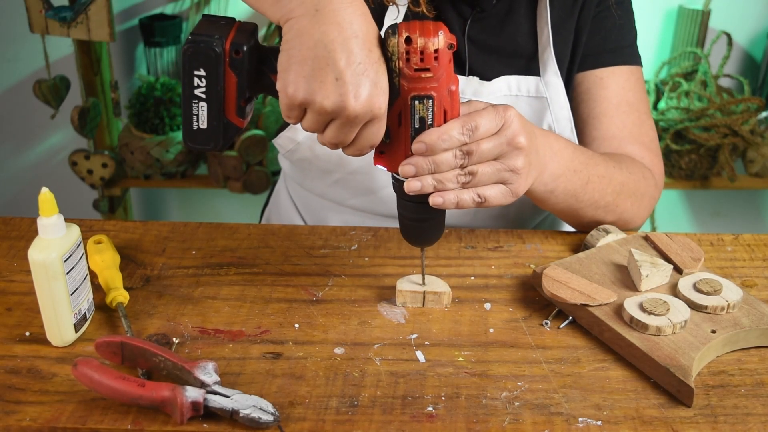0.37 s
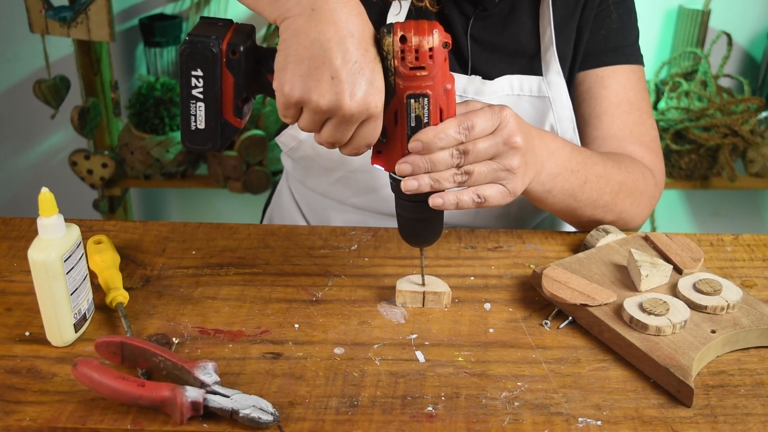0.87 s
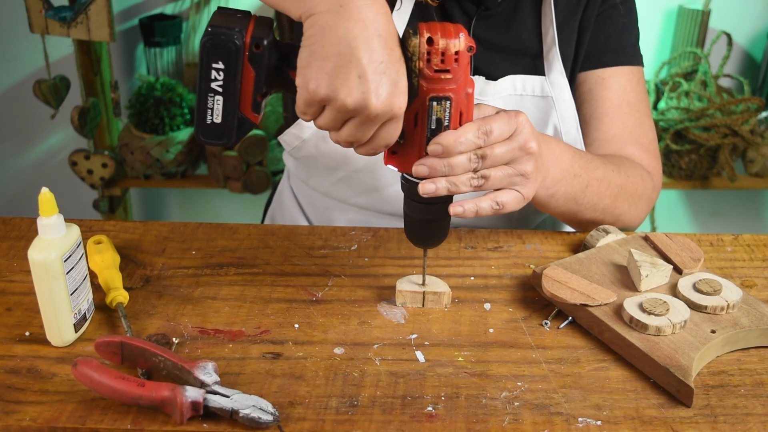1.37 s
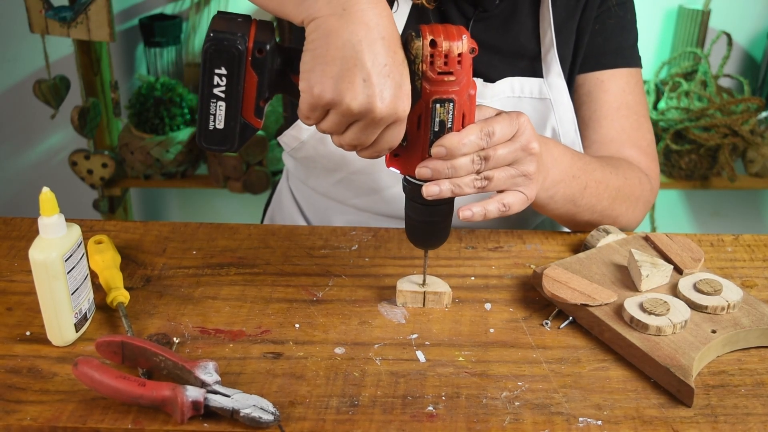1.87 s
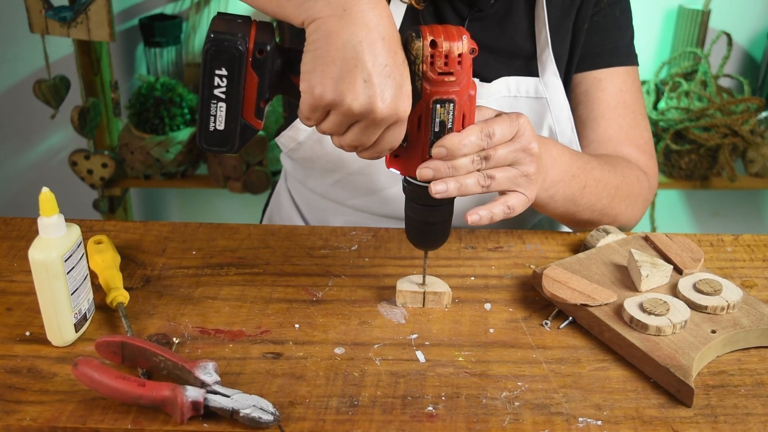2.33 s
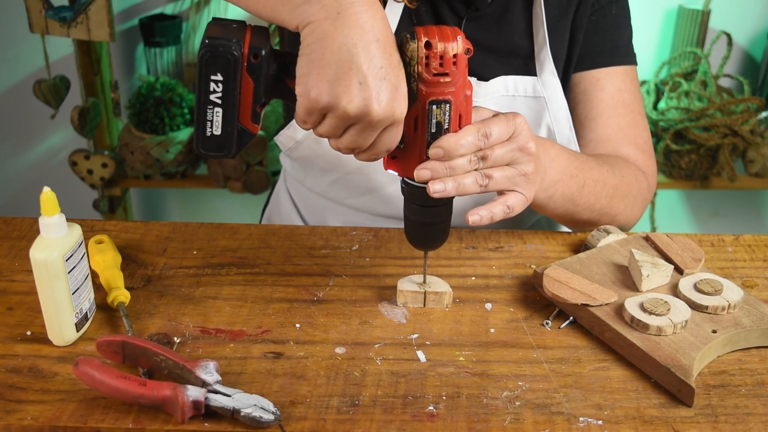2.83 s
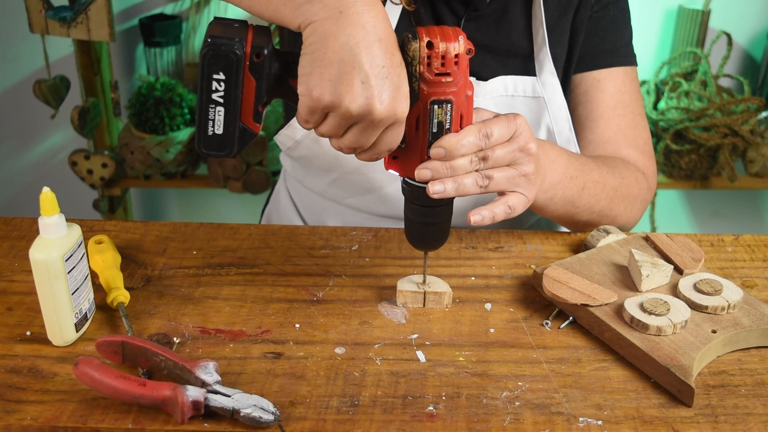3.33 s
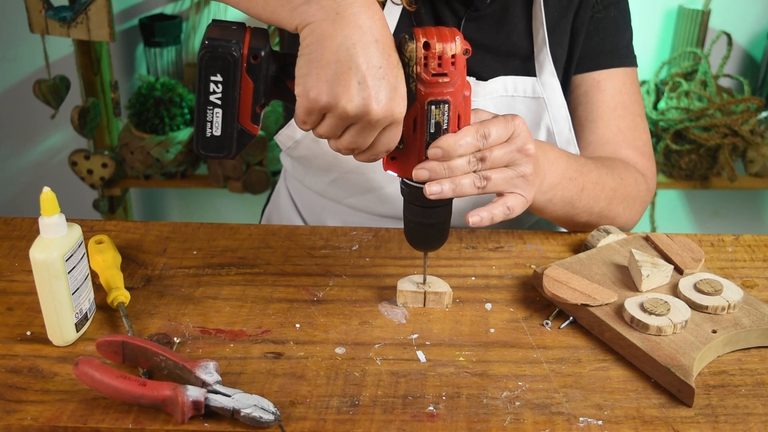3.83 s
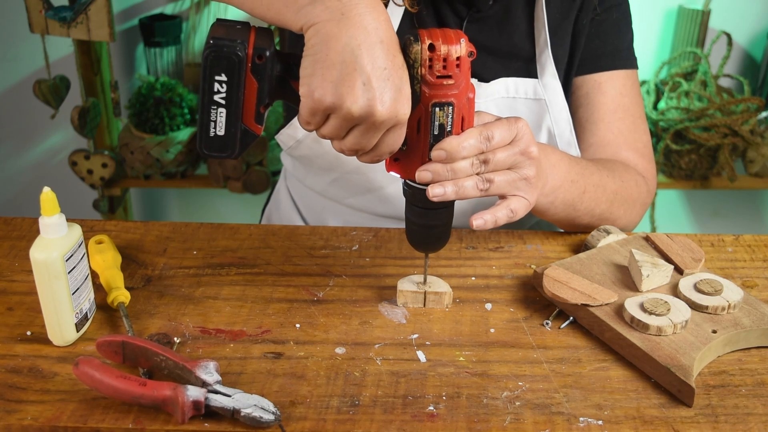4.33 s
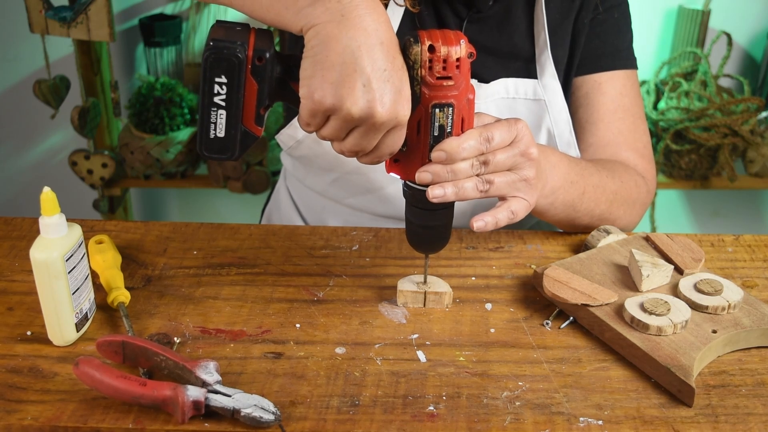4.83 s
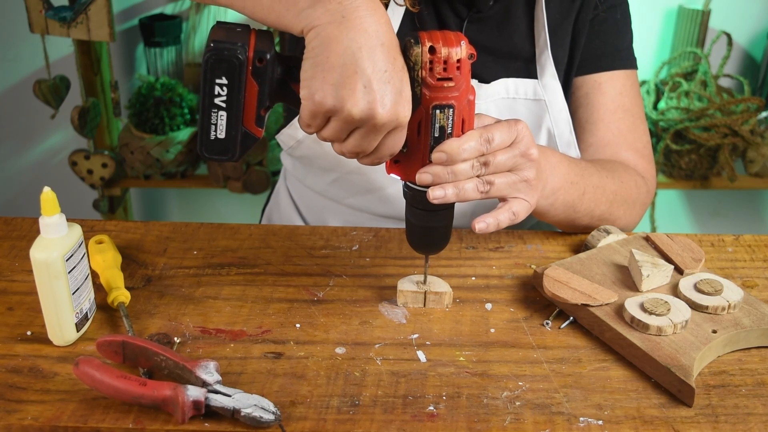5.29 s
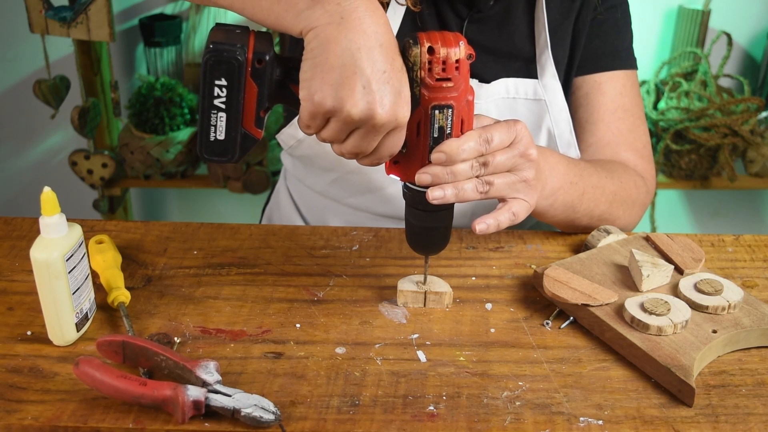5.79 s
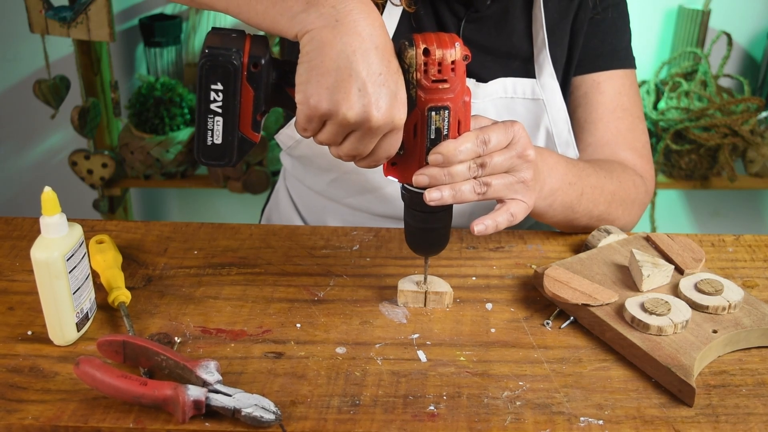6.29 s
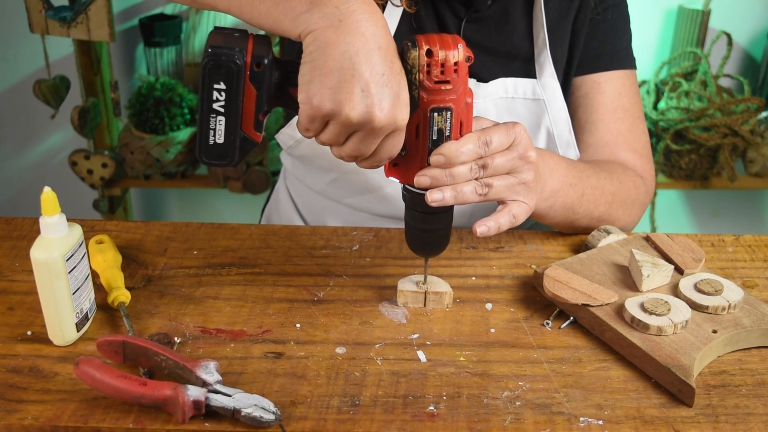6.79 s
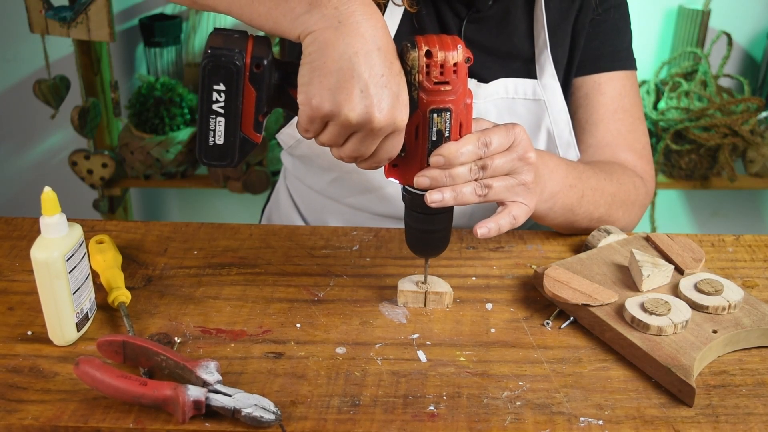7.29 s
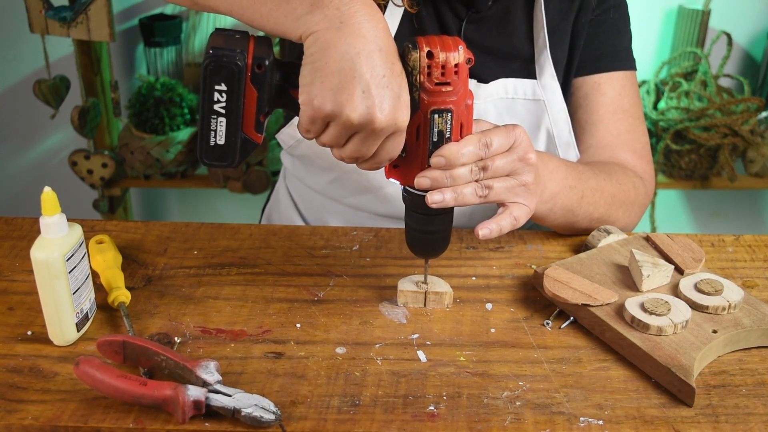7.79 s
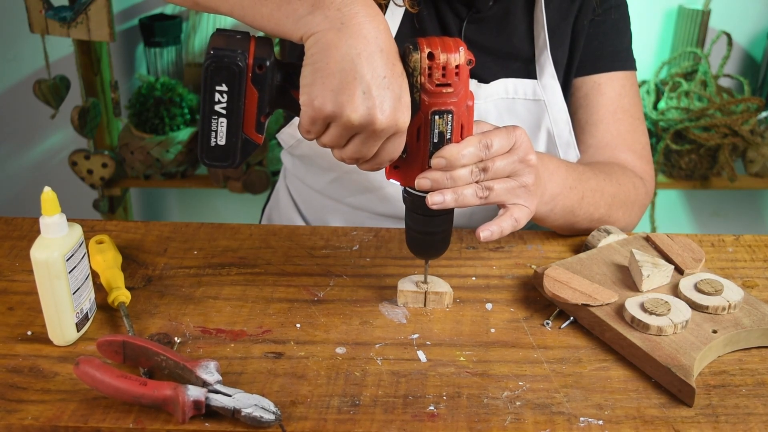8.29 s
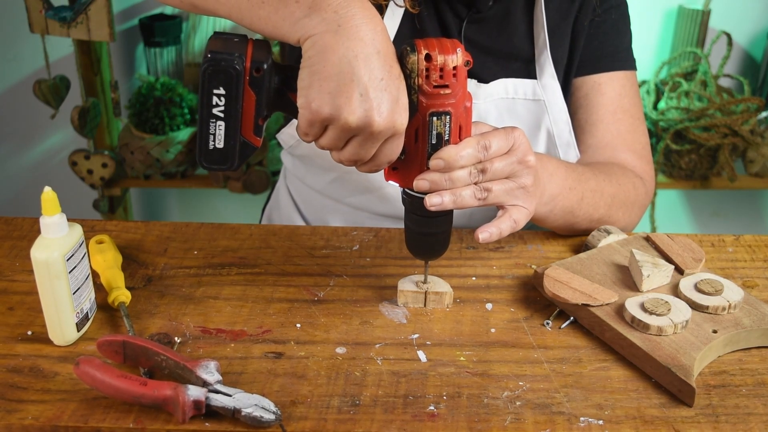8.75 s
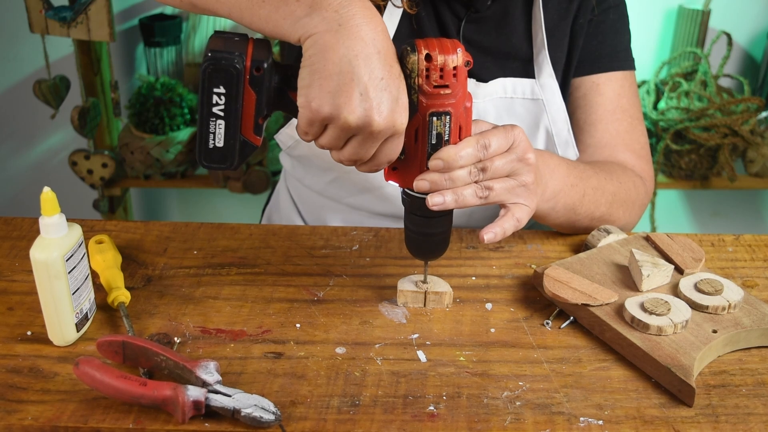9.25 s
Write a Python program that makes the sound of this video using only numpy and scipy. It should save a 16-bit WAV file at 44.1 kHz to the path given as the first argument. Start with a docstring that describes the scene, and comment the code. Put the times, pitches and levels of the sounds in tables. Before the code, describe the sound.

A small cordless drill is already running at full speed and never stops. A piercing motor and gear whine sits over bright hiss and gritty rattle, throbbing rapidly with the turning chuck. After about a second and a half the bit bites the wood; the throb roughens and the pitch sags very slightly. Faint rasp and low bench hum lie below. Close, dry, mono microphone.

```python
"""On a workbench, a cordless drill bores into a scrap of wood, close to a mono microphone.
The three-pole brushed motor whines in sine tones over brush hiss, noise that pulses with the motor's turns.
A two-stage planetary gearbox sings on its tooth rate with noisy skirts, throbbing once, twice and three times
a chuck turn, and changes its song as the bit bites and goes deeper. Noise gives rattle, ticks, rasp and rumble."""
import sys
import numpy as np
from scipy import signal
from scipy.fft import rfft, irfft, next_fast_len
from scipy.io import wavfile
from scipy.ndimage import map_coordinates

SR = 44100
rng = np.random.default_rng(int(sys.argv[2]) if len(sys.argv) > 2 else 0)


def invert_db(x):
    """Field ratio 10**(x/20) for x, a level in decibels (scalar or array-like)."""
    u = np.asarray(x, float) / 20
    return 10 ** u


def bounce(signal):
    """Save signal as a 16-bit WAV file at the path given by the first command-line argument."""
    frames = np.transpose(np.atleast_2d(signal))
    limited = np.clip(frames, -1, 1)
    pcm = np.round(limited * 32767).astype(np.int16)
    wavfile.write(sys.argv[1], SR, pcm)


N = 413658  # length in samples

RING_TEETH = 39
STAGE = 9 / (9 + RING_TEETH)  # turns out per turn in: each stage has a 9-tooth sun in the ring


def unit(x):
    """Scales x to rms 1."""
    return x / np.sqrt(np.mean(np.abs(x) ** 2) + 1e-20)


def curves(rows):
    """One value per sample for each column after the time in seconds."""
    seconds, *columns = np.transpose(rows)
    return [np.interp(np.arange(N) / SR, seconds, column) for column in columns]


def wobble(rate):
    """A random curve: straight lines between normal-distributed knots, rate knots a second."""
    knots = rng.standard_normal(int(N * rate / SR) + 4)
    return map_coordinates(knots, [np.arange(N) * rate / SR], order=1)


def noise(response):
    """Noise of rms 1 with the given gain over frequency."""
    m = next_fast_len(N)
    spectrum = rfft(rng.standard_normal(m)) * response(np.fft.rfftfreq(m, 1 / SR))
    return unit(irfft(spectrum, m)[:N])


def coloured(points):
    """Noise with a (Hz, dB) spectrum, falling 19 dB an octave more below its first point."""
    f, db = np.transpose(points)

    def gain(hz):
        outline_db = np.interp(np.log(hz + 1), np.log(f + 1), db)
        return invert_db(outline_db - 19 * np.log2(np.maximum(f[0] / (hz + 1), 1)))

    return noise(gain)


def humming(hz, width_hz):
    """Noise in one resonance, width_hz wide at half amplitude."""
    return noise(lambda f: 1 / (1 + (2 * (f - hz) / width_hz) ** 2))


def scatter(width_hz):
    """Quick random changes, weak below 9 Hz: they average out within a chuck turn or two."""
    return noise(lambda f: np.clip(f / 9, 0, 1) ** 2 / (1 + (2 * f / width_hz) ** 2))


def round_turn(pairs, turns):
    """Sum of swings once, twice, .. a turn, each a (size, place of its top in turns) pair."""
    grid = np.linspace(0, 1, 1025)
    shape = np.zeros(len(grid))
    for k, (size, place) in enumerate(np.reshape(pairs, (-1, 2))):
        shape += size * np.cos(2 * np.pi * (k + 1) * (grid - place))
    return shape[(turns % 1 * (len(grid) - 1)).astype(int)]


def depth_shares():
    """Amplitude share of each depth of the bit; the powers add to one."""
    # Each row: time in seconds, depth of the bit (0 touching, 1 biting, 2 deep).
    depth_rows = [(0, 0), (1.4, 0), (2.05, 1), (5.4, 1), (6.4, 2), (9.4, 2)]
    depth, = curves(depth_rows)
    return [np.sqrt(np.clip(1 - abs(depth - k), 0, 1)) for k in range(3)]


def by_depth(db):
    """A (touching, biting, deep) level read at the load on the bit."""
    # How hard the bit works. Each row: time in seconds, load (0 touching, 1 biting, 2 deep).
    load_rows = [(0, 0), (1.25, .05), (2.1, .85), (3.5, 1.05), (5, 1.4), (6.6, 1.66), (8, 1.9)]
    return np.interp(curves(load_rows)[0], np.arange(len(db)), db)


def throbbing(spectra, throbs, chuck, shares):
    """Noise whose colour and throb round the chuck turn follow the depth."""
    out = np.zeros(N)
    for points, throb, share in zip(spectra, throbs, shares):
        out += share * invert_db(round_turn(throb, chuck)) * coloured(points)
    return out


def bench_shake():
    """The work shakes the bench: a slowly changing rumble in a resonance round 100 Hz."""
    # Each row: time in seconds, level in dB.
    rumble_rows = [(1, -80), (3, -70), (4, -80), (6, -79), (8, -71), (9.4, -75)]
    return invert_db(curves(rumble_rows)[0] + 1.5 * wobble(3)) * humming(100, 45)


def bench_noise(chuck, shares, flutter):
    """The bench rumbles under the drill: broad low noise that throbs with the chuck."""
    # Colour of the bench. Each row: frequency in Hz, relative density in dB per Hz.
    spectrum = [(15, -71), (25, -28), (151, -13), (216, -16), (285, -11), (394, -6), (444, -12), (519, 0),
                (718, -10), (961, -17), (1200, -10), (1350, -6), (1500, -7), (1950, -31), (3300, -120)]
    # Each row, a depth: size in dB and place of its top in turns, for swings 1, 2, 3 times a chuck turn.
    throbs = [(.9, 0.51, .2, .45, .4, 0.14), (1.3, .05, 0.63, 0.33, .2, .3), (1.4, .08, .5, .45, .3, .02)]
    # Level in dB when touching, biting, deep.
    levels_db = (-49.5, -53.5, -52)
    level_db = by_depth(levels_db) + .5 * flutter + 0.4 * wobble(6)
    return invert_db(level_db) * throbbing([spectrum] * 3, throbs, chuck, shares)


def drum(chuck):
    """The bench top hums unsteadily on one low mode, beating with a tone tied to the chuck."""
    # Swells of the bench top. Each row: centre in seconds, height in dB over its hum.
    swells = [(1.72, 16), (2.26, 5), (3.36, 12), (4.6, 4), (5.64, 4), (6.03, 7), (6.4, 8), (8.55, 8),
              (8.85, 6)]
    # Level of the hum in dB when touching, biting, deep.
    hum_db = (-73, -70.5, -65.5)
    # Level of the chuck tone in dB when touching, biting, deep.
    chuck_tone_db = (-70, -70.5, -67)
    half_length_s = 0.072  # of a swell, where its dB height is down to 1/e
    t = np.arange(N) / SR
    mode_db = by_depth(hum_db) + 3.2 * wobble(9)
    for centre_s, height_db in swells:
        mode_db += height_db * np.exp(-((t - centre_s) / half_length_s) ** 2)
    mode_hz = 160.5 + 1.58 * wobble(4)
    mode = np.sin(2 * np.pi * np.cumsum(mode_hz) / SR)
    tone = np.sin(2 * np.pi * 15 * chuck)
    tone_db = by_depth(chuck_tone_db) + 3.2 * wobble(7)
    return np.sqrt(2) * (invert_db(mode_db) * mode + invert_db(tone_db) * tone)


def rasp():
    """The bit's edges rasp the wood in irregular surges: noise in a resonance."""
    # Level in dB when touching, biting, deep.
    levels_db = (-50.5, -48.3, -48)
    surge_db = 3.2 * wobble(11) + 2.2 * wobble(20)
    return invert_db(by_depth(levels_db) + surge_db) * humming(1113, 280)


def brush_hiss(turns, chuck, shares, flutter):
    """Brushes hiss on the commutator: high noise pulsing mostly three times a motor turn."""
    # Colours of the hiss by depth. Each row: frequency in Hz, relative density in dB per Hz.
    touching = [(3530, -36), (6000, -6.5), (6500, -15), (6810, -6), (7000, -3.5), (7460, -6.5), (8240, 2),
                (9740, 2.5), (11200, -2.5), (12300, -8.5), (14400, -19), (15500, -23)]
    biting = [(3530, -18), (6000, -12.5), (7460, -5.5), (8140, 0), (9070, 2.5), (10300, -3.5),
              (10900, -5.5), (11600, -15), (13100, -15.5), (15500, -26)]
    deep = [(3530, -32), (6000, -8), (6680, -9.5), (9030, 1), (10200, -4.5), (10800, -6), (11600, -18),
            (14400, -21), (15500, -26)]
    # Each row, a depth: size in dB and place of its top in turns, for swings 1, 2, 3 times a chuck turn.
    throbs = [(1, 0.62, 0.54, 0.42, .25, 0.12), (0.4, 0.82, 0.41, 0.27, .1, 0.25),
              (0.6, 0.33, 0.3, 0.11, 0.95, 0.64)]
    # Level in dB when touching, biting, deep.
    levels_db = (-32.5, -31, -30)
    pulse_db = round_turn((.15, .1, .25, .2, 1, .1, .4, .1), turns)
    level_db = by_depth(levels_db) + .4 * flutter + .6 * wobble(300) + pulse_db
    return invert_db(level_db) * throbbing((touching, biting, deep), throbs, chuck, shares)


def gear_rattle(chuck, shares, flutter):
    """Gears rattle under their teeth: noise that bursts once a tooth."""
    # Colours of the rattle by depth. Each row: frequency in Hz, relative density in dB per Hz.
    touching = [(470, -60), (800, -27), (1100, -30), (1210, -8), (1480, -5), (1580, -2), (1860, -15.5),
                (1980, 3.5), (2380, 1.5), (2980, -11.5), (3950, -2.5), (4740, -20), (5240, -9.5),
                (6330, -39), (7000, -21), (9100, -49), (15400, -120)]
    biting = [(470, -24.5), (800, -26.5), (959, -23.5), (1180, -11), (1350, -6.5), (1610, -5.5),
              (1840, -10), (1960, -3), (2230, -2), (2380, 1.5), (2980, -9), (3670, -9), (3950, -7.5),
              (4610, -14), (7000, -14), (9100, -45), (15400, -120)]
    deep = [(470, -34.5), (800, -38), (968, -35), (1200, -13.5), (1340, -11.5), (1680, -8), (1840, -20.5),
            (1960, -2), (2170, -7.5), (2380, -0.5), (2630, -13), (3270, -11.5), (4570, -23.5),
            (5100, -13.5), (7000, -23.5), (9100, -41), (15400, -120)]
    # Each row, a depth: size in dB and place of its top in turns, for swings 1, 2, 3 times a chuck turn.
    throbs = [(1.2, 0.84, 0.61, 0.46, 0.3, 0.15), (0.64, 0.057, 0.71, 0.28, 0.56, 0.26),
              (0.65, 0.24, .5, 0.25, 1.15, 0.25)]
    # Level in dB when touching, biting, deep.
    levels_db = (-31, -31, -30)
    burst_db = round_turn((2.73, 0.14, 2.3, 0.087), RING_TEETH * chuck)
    level_db = by_depth(levels_db) + 0.7 * flutter + burst_db
    return invert_db(level_db) * throbbing((touching, biting, deep), throbs, chuck, shares)


def tooth_ticks(chuck, shares, flutter):
    """Teeth tick as they meet: grainy treble noise that bursts once a tooth."""
    # Colour of the ticks. Each row: frequency in Hz, relative density in dB per Hz.
    spectrum = [(6590, -28), (11200, -4), (11600, -3), (15100, -12), (15500, -15)]
    # Each row, a depth: size in dB and place of its top in turns, for swings 1, 2, 3 times a chuck turn.
    throbs = [(1.6, .75, .8, .34, .4, .08), (1.2, .05, .6, .37, .3, .3), (.9, .17, .5, .33, .9, .29)]
    # Level in dB when touching, biting, deep.
    levels_db = (-48, -48.5, -50.5)
    burst_db = round_turn((2.6, .1, 1.6, .1), RING_TEETH * chuck)
    grain_db = 3.5 * wobble(1500) + 1.5 * wobble(11)
    level_db = by_depth(levels_db) + .8 * flutter + grain_db + burst_db
    return invert_db(level_db) * throbbing([spectrum] * 3, throbs, chuck, shares)


def motor(turns):
    """Shaft, commutator and gear-tooth tones at multiples of the motor speed, each a little unsteady."""
    # Tones of the motor and both gear stages, as multiples of motor speed.
    orders = [.678, 1, 1.3711, 2, 3, 6, 7.3125, 9, 12, 14.625, 15, 21, 24, 27, 29, 30, 31, 32, 33, 34, 35,
              36, 37, 39, 42]
    # Each row, one of these tones: level in dB when touching, biting, deep.
    tone_db = [(-86, -79.5, -77.5), (-58, -67, -66.5), (-65.5, -66.5, -66.5), (-59, -68.5, -73),
               (-61, -57, -60), (-44, -44.5, -46), (-38.5, -53, -44), (-49, -47, -43.5),
               (-53, -50.5, -46.5), (-70.7, -69, -64), (-50, -53, -57), (-64, -52, -53),
               (-52.5, -48.5, -47.5), (-41, -40, -44), (-53, -51, -48), (-41, -36, -38), (-55.5, -59, -46),
               (-56, -51, -54), (-39.5, -38.5, -46), (-44, -45, -47), (-51, -47, -57.5), (-46, -42, -45),
               (-53, -55, -57.4), (-61.5, -63.5, -65), (-67, -65.5, -60)]
    # Slow swells. Each row: time in seconds, commutator tones in dB, first-stage tooth tone in dB.
    swell_rows = [(.4, 2, 1), (1.2, -0.5, 1), (2.2, 2, 2), (3.5, -.5, -6), (5, -0.5, -4.5), (6.6, 0, -8),
                  (7.8, -1, 1.5), (9, -1, 4)]
    commutator_from, first_stage = 27, RING_TEETH * STAGE  # multiples of motor speed
    out = np.zeros(N)
    commutator_db, stage_db = curves(swell_rows)
    for order, db in zip(orders, tone_db):
        swell_db = commutator_db * (order >= commutator_from) + stage_db * (order == first_stage)
        level = np.sqrt(2) * invert_db(by_depth(db) + swell_db + .8 * wobble(5) + 1.2 * wobble(40))
        phase = 2 * np.pi * (order * turns + rng.random()) + 0.0075 * order * wobble(30)
        out += level * np.sin(phase)
    return out


def mesh(chuck, shares):
    """Planets roll round the ring: every overtone of the tooth rate swells and wanders with the chuck's angle."""
    # Each row, a mesh tone: multiple of tooth rate, extra cycles a chuck turn when touching, biting, deep.
    tones = [(2, -1, 0, 0), (3, -1, 0, 0), (4, 0, 0, 1), (5, 1, 1, 1), (6, 0, -1, 1), (7, 1, 1, 2),
             (8, 2, 2, 2), (9, -1, 2, 2), (10, 0, 0, 0), (11, 0, 1, 1), (12, 2, 2, 3), (13, 1, 1, 4),
             (16, 0, 3, 1)]
    # Each row, a mesh tone: level in dB when touching, biting, deep.
    tone_db = [(-76, -61, -59.5), (-53, -48.5, -44.5), (-39.5, -45, -50), (-39.5, -41.5, -41),
               (-33.5, -39, -37), (-53, -49.5, -46), (-46.5, -44.5, -43.5), (-64, -59.5, -64),
               (-47, -44, -47), (-63.5, -49, -59), (-66, -52, -54), (-62.5, -65.5, -58.5), (-66, -57, -54)]
    # Tooth-to-tooth scatter. Each row, a mesh tone: width in Hz, dB over the tone touching, biting, deep.
    scatter_rows = [(60, 3, -15, -19), (60, -9, -11, -14), (88, 1.5, 0, -4.5), (100, -2, -4, -10.5),
                    (104, -1, -7, -3.5), (90, 8, -21, -5), (111, -3.5, 2, 2), (90, 10, -11, -17),
                    (111, 4.5, 2.5, -1), (90, 8, -17, -12), (100, 10, -2, -5), (120, 8, 17, -1.5),
                    (120, 5, -3, 0)]
    # Throb of all tones while touching: size in dB and place of its top in turns, for 1, 2, 3 a chuck turn.
    throb_free = (2.7, 0.77, 2.3, 0.47, 3.6, 0.2)
    # Throb under load. Each row, a mesh tone: the same columns, in dB and turns.
    throb_loaded = [(3, .1, 1.8, .4, 1.6, .33), (3.5, .075, 3.2, .49, .7, .06),
                    (1.2, .9, 3.4, .305, 1.8, .17), (4.8, .25, 3.8, .045, 4.7, .3),
                    (6.5, .24, 6.3, .46, 2.4, .06), (7, .39, 1.6, .4, 6, .325),
                    (6.3, .38, 3.1, .17, 2.7, .015), (3, .38, 2.8, .25, 1, .28),
                    (12.2, .3, 5.8, .085, 2.3, .26), (12, .21, 8.5, .39, 4, .16),
                    (6.2, .29, 4.4, .22, 3.6, .22), (15, .33, 8, .27, 4.5, .17),
                    (11, .45, 5.5, .24, 4, .01)]
    # Share of the loaded throb's dB at 1, 2, 3 a turn once the bit is deep.
    deep_share = (0.67, 0.84, 1.13)
    # Each row, a depth: share of the tone's wander and place of its top in turns, for 1, 2 a chuck turn.
    wander_rows = [(.5, .33, 0.3, 0.3), (.95, 0.48, 0.42, .22), (1.05, .52, .42, 0.22)]
    # Tooth contact runs early and late: wander of each mesh tone in radians, scaled by those shares.
    wander_sizes = [.15, .4, 1.4, 2.5, 2, 1.7, 0.82, 1.1, 2.64, 1.9, 0.74, 2, 3.2]
    out = np.zeros(N)
    levels = [invert_db(by_depth(db)) for db in tone_db]
    throb_deep = np.array(throb_loaded) * np.ravel([(share, 1) for share in deep_share])
    throb_tables = [throb_free] * len(tones), throb_loaded, throb_deep
    for depth, (share, table) in enumerate(zip(shares, throb_tables)):
        on = share > 0
        turns = chuck[on]
        wander = round_turn(wander_rows[depth], turns)
        rows = zip(tones, levels, table, wander_sizes, scatter_rows)
        for (overtone, *slip), level, throb, wander_rad, (width_hz, *scatter_db) in rows:
            throb_db = round_turn(throb, turns)
            cycles = (overtone * RING_TEETH + slip[depth]) * turns
            phase = 2 * np.pi * cycles + wander_rad * wander
            tone_level = np.sqrt(2) * invert_db(throb_db + .7 * wobble(40)[on])
            tone = tone_level * np.cos(phase + .25 * wobble(40)[on])
            # no two tooth contacts are alike: a noisy skirt that follows part of the throb
            a, b = scatter(width_hz)[on], scatter(width_hz)[on]
            skirt_level = invert_db(scatter_db[depth] + 0.27 * throb_db)
            skirt = skirt_level * (a * np.cos(phase) + b * np.sin(phase))
            out[on] += share[on] * level[on] * (tone + skirt)
    return out


def scene():
    """The motor turns the chuck through two gear stages; one flutter in level is shared by four noises."""
    # Each row: time in seconds, motor speed in turns per second.
    speed_rows = [(0.0, 296.25), (0.5, 295.15), (1.0, 292.08), (1.5, 293.55), (1.75, 292.74),
                  (2.62, 293.16), (3.12, 291.65), (3.62, 290.41), (4.0, 290.33), (4.62, 288.64),
                  (5.12, 290.11), (5.62, 289.45), (6.88, 290.86), (7.5, 290.39), (7.88, 288.89),
                  (8.38, 288.16), (9.0, 288.87), (9.38, 291.49)]
    turns = np.cumsum(curves(speed_rows)[0]) / SR
    chuck = turns * STAGE ** 2
    shares = depth_shares()
    flutter = wobble(14)
    drill = bench_shake() + bench_noise(chuck, shares, flutter) + drum(chuck) + rasp()
    drill += brush_hiss(turns, chuck, shares, flutter)
    drill += gear_rattle(chuck, shares, flutter) + tooth_ticks(chuck, shares, flutter)
    drill += motor(turns) + mesh(chuck, shares)
    return np.array([drill, drill])


def roll_off(x):
    """The treble ends steeply here."""
    return signal.sosfilt(signal.butter(12, 15640, fs=SR, output="sos"), x)


def record(dry):
    """One microphone on both channels, with a gentle bass cut below 90 Hz."""
    bass_cut = signal.butter(1, 90, "highpass", fs=SR, output="sos")
    mix = signal.sosfilt(bass_cut, dry)
    return roll_off(mix)


dry = scene()
out = record(dry)
bounce(out)
```